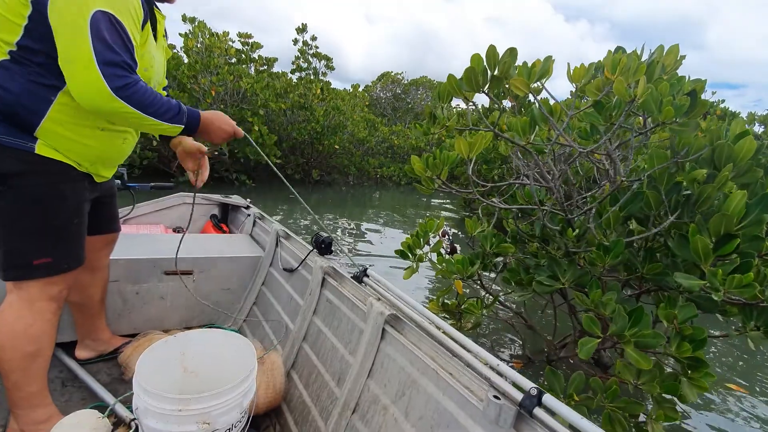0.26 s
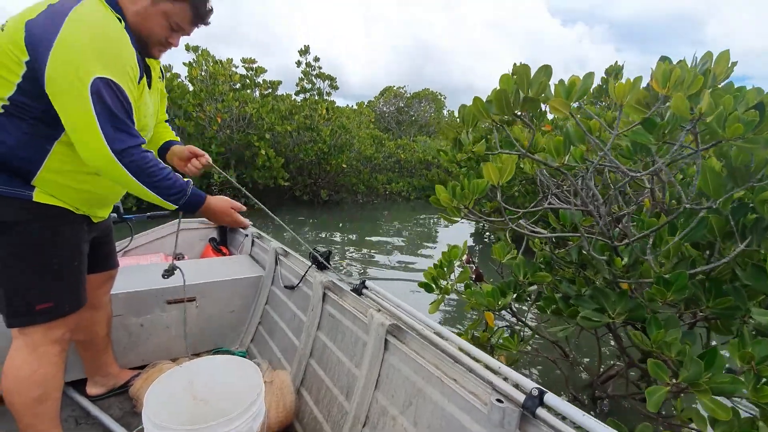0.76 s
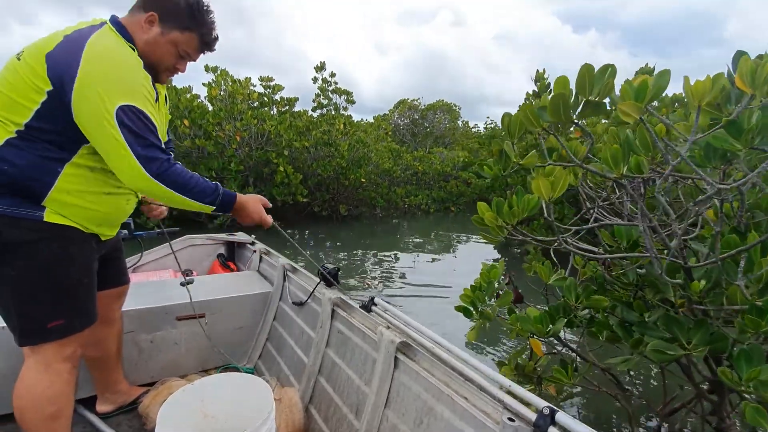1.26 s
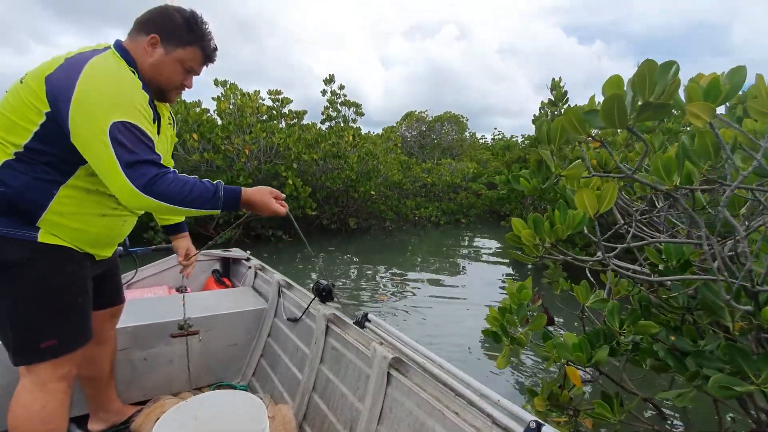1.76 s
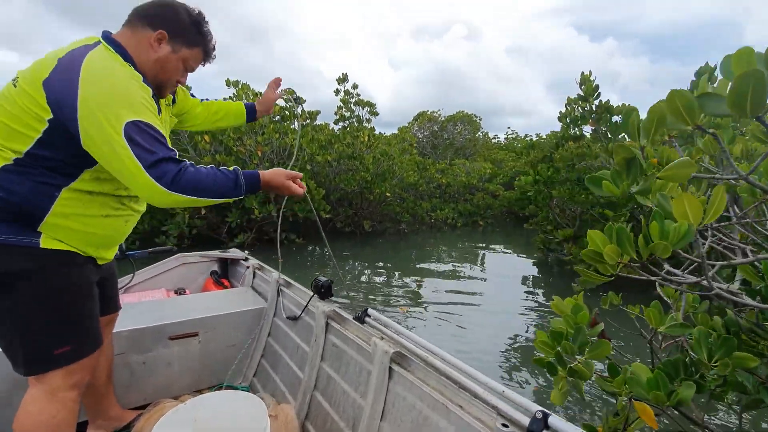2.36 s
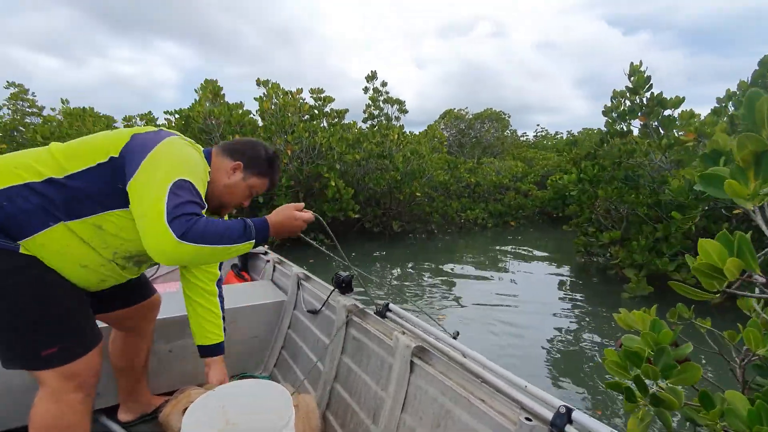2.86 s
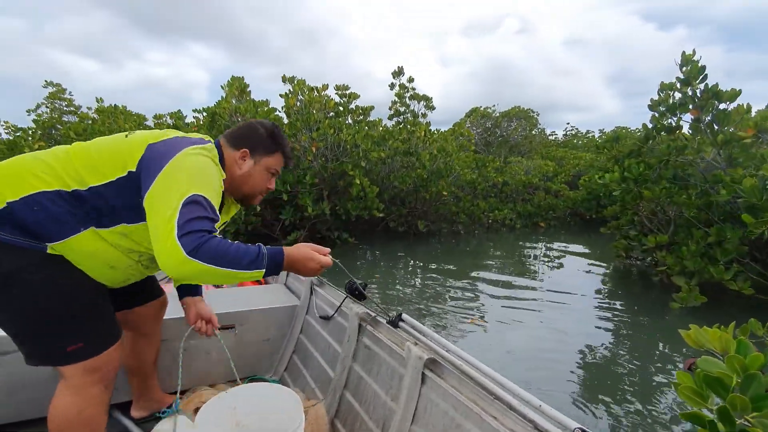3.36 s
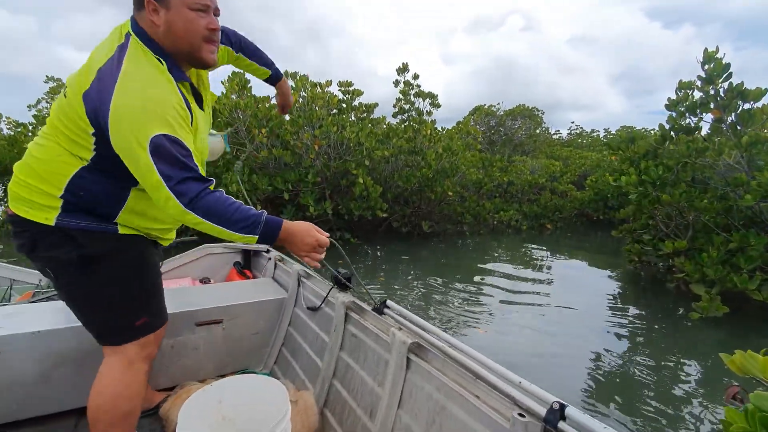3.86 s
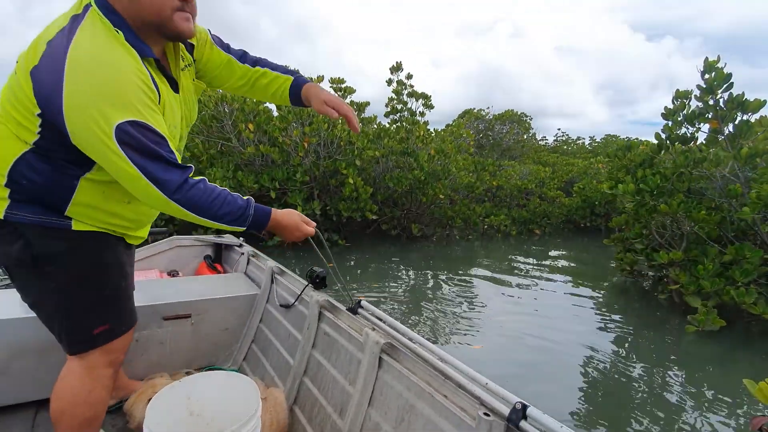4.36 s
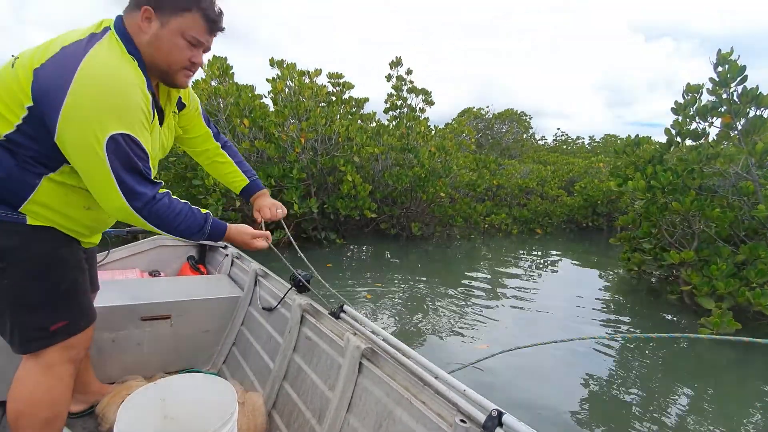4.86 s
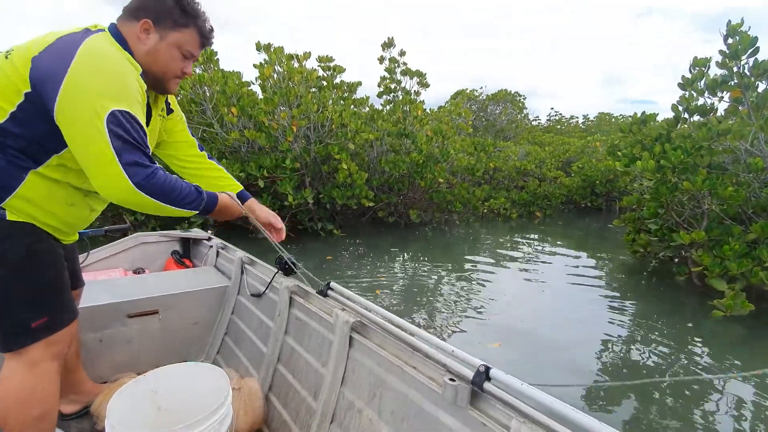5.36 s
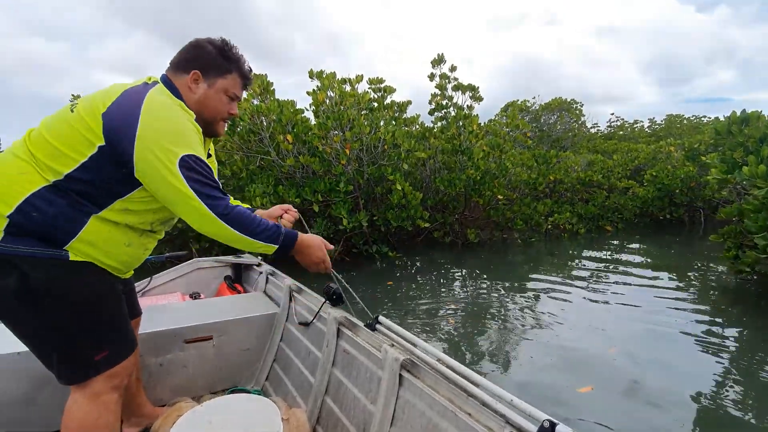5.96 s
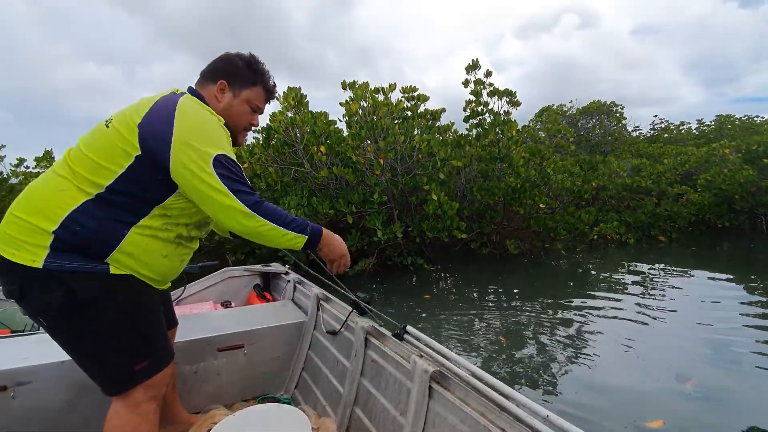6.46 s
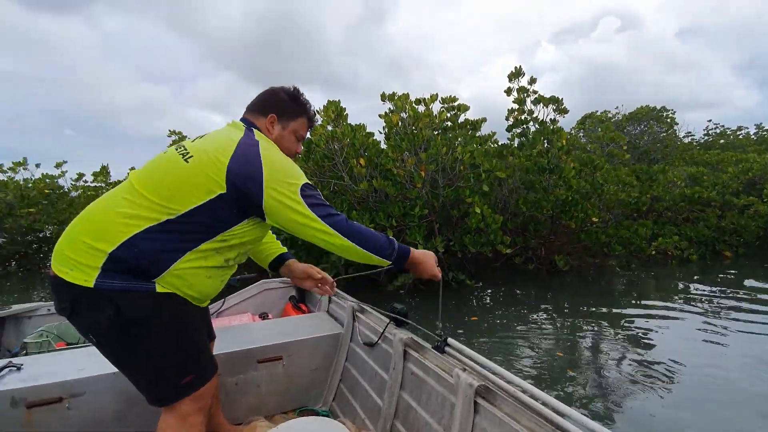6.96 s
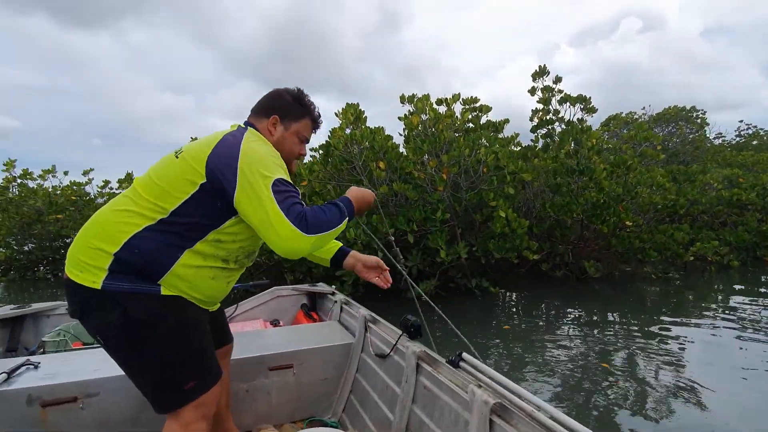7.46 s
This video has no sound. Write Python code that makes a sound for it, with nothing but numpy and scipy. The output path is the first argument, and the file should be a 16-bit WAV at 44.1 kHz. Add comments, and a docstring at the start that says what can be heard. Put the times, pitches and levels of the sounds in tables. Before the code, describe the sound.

Close, irregular metallic bangs and rattles on a small aluminium hull, with faint rope drag, wet hiss and droplets between them.

```python
"""Rope haul into an aluminium boat

A weighted rope comes hand over hand into a small boat on a still mangrove creek. Knocks excite hull modes
and dense panel noise; uneven slips drag the wet rope over the gunwale and shake damped hull modes.
Wet line hisses and swishes as shaped noise, light thuds and splashes are resonant noise bursts, and droplets
ring briefly in tuned bands. Short hollow notes are swelling sines; a light breeze on the microphone ports
and a faint far band are filtered noise."""
import sys
import numpy as np
from scipy import signal
from scipy.fft import rfft, irfft, next_fast_len
from scipy.io import wavfile

SR = 44100
rng = np.random.default_rng(int(sys.argv[2]) if len(sys.argv) > 2 else 0)


def transcribe(signal):
    """Save signal, clipped to [-1, 1], as a 16-bit WAV file at the path in sys.argv[1]."""
    frames = np.atleast_2d(signal).T
    limited = np.clip(frames, -1, 1)
    pcm = np.round(limited * 32767).astype(np.int16)
    wavfile.write(sys.argv[1], SR, pcm)


N = 340011

# ringing modes of the hull: mode_hz [Hz], level_db [dB, relative]
HULL_MODES = [(125, -9.5), (190, -6), (256, -5), (335, -11.5), (428, -10), (580, 0.5), (805, -1),
              (1030, -3), (1230, -1), (1490, -7), (2020, -10.5), (2567, -11), (3062, -9), (4780, -12)]


def from_db(db):
    """Amplitude gain is ten to the power of decibels over twenty."""
    return 10 ** (np.asarray(db) / 20)


def rms_one(x):
    """Normalise the root-mean-square amplitude to 1."""
    return x / np.sqrt(np.mean(x ** 2) + 1e-20)


def at_hz(points, hz):
    """Interpolate a spectrum linearly along a logarithmic frequency axis."""
    points = np.array(points)
    return np.interp(np.log(hz), np.log(points[:, 0]), points[:, 1])


def drift(rate_hz):
    """Slow random fluctuation of rms 1: noise through two equal low-pass poles at rate_hz."""
    step = 40   # samples between computed values
    pole = np.exp(-2 * np.pi * step * rate_hz / SR)
    noise = rng.standard_normal(N // step + 2002)
    slow = signal.lfilter([1], [1, -2 * pole, pole * pole], noise)[2000:]   # settled part
    return np.interp(np.arange(N) / step, np.arange(len(slow)), rms_one(slow))


def resonate(x, modes):
    """Parallel two-pole resonances (Hz, width Hz, dB) whose signs alternate."""
    out = 0
    for k, (hz, width_hz, level_db) in enumerate(modes):
        pole = np.exp(-np.pi * max(width_hz, 5) / SR)
        top = (1 - pole * pole) / 2 * from_db(level_db) * (-1) ** k
        feedback = [1, -2 * pole * np.cos(2 * np.pi * hz / SR), pole * pole]
        out = out + signal.lfilter([top, 0, -top], feedback, x)
    return out


def bands(noises):
    """Half-octave filter bank: (centre Hz, slice), two noises dealt in turn to neighbouring bands."""
    edges = 22 * 2 ** np.arange(0, 10, .5)
    for k, (low, high) in enumerate(zip(edges, edges[1:])):
        band = signal.butter(3, [low, high], "band", fs=SR, output="sos")
        yield np.sqrt(low * high), signal.sosfilt(band, noises[k % 2])


def spread(mid, side, hz):
    """Diffuse-field coherence: mid and side noises mixed to the left-right likeness at this pitch."""
    # likeness of diffuse sound at the two ports: band_hz [Hz], likeness [0 to 1]
    likeness = [(240, 0.93), (950, 0.49), (3770, 0.02)]
    alike = np.clip(at_hz(likeness, hz), 0, 1)
    return np.sqrt(1 + alike) * mid + np.sqrt(1 - alike) * side * [[1], [-1]]


def diffuse(spectrum, patchy_db):
    """Diffuse stereo noise of rms 1: each band has its own level, flicker and coherence."""
    out, together = 0, drift(15.0)
    low, high = spectrum[0][0], spectrum[-1][0]
    for hz, (mid, side) in bands(rng.standard_normal((2, 2, N))):
        if low / 1.5 < hz < high * 1.2:
            gain = from_db(at_hz(spectrum, hz) + patchy_db * (together + drift(24)))
            out = out + gain * spread(mid, side, hz)
    return rms_one(out)


def place(length, start_s):
    start = round(start_s * SR)
    at = slice(start, min(N, start + length))
    return at, np.arange(at.stop - start) / SR


def rubbing(low_hz, high_hz, side_db):
    """Friction excitation: uneven slips of the rope shake the hull modes between two pitches; rms 1."""
    slips = rng.standard_normal((2, N)) * from_db(2.6 * drift(12))
    damped = [(hz, 0.11 * hz, level_db) for hz, level_db in HULL_MODES if low_hz < hz < high_hz]
    shaken = resonate(slips, damped)
    mid, side = resonate(shaken, [(np.sqrt(low_hz * high_hz), high_hz, 0)])
    return rms_one(mid + from_db(side_db) * side * [[1], [-1]])


def rope(drag_db, rasp_db):
    """Friction drives low hull modes as the drag and higher ones as a wider rasp on top of it."""
    drag = rubbing(63, 450, side_db=-13.0)
    rasp = rubbing(430, 1550, side_db=-1.5)
    return from_db(drag_db) * (drag + from_db(rasp_db) * rasp)


def add_swishes(hiss_db, now):
    """Wet line whipping through the air lifts the hiss to a crest, falling linearly in dB on both sides."""
    # whips of the line: crest_s [s], level_db [dB], length_s [s]
    swishes = [(4.441, -42.5, 0.21), (5.975, -36.5, 0.042)]
    for crest_s, level_db, length_s in swishes:
        away = np.abs(now - crest_s) / length_s
        hiss_db = np.maximum(hiss_db, level_db - 16 * away)   # 16 dB down after one length
    return hiss_db


def spatter(hiss_db):
    """Random arrivals: droplets fly off the line, more with a louder hiss; each rings a few damped cycles."""
    born = rng.random(N) < 260 * from_db(hiss_db + 48) / SR   # 260 a second at -48 dB
    sizes = born * from_db(3.5 * np.minimum(rng.exponential(1, N), 4) - 39.5)
    dealt, out = rng.integers(0, 12, N), np.zeros((2, N))
    for k, hz in enumerate(np.geomspace(1300, 7000, 12)):
        drops = sizes * (dealt == k) + 1e-18
        balance = from_db(rng.normal(0, 1.9, (2, 1)))
        out += resonate(drops, [(hz, 0.16 * hz, 0)]) * balance
    return out


def wet_line(hiss_db):
    """Broadband diffuse noise for the wet hiss, joined by the droplets that follow its level."""
    # colour of the hiss: band_hz [Hz], density_db [dB per Hz, relative]
    hiss = [(880, -35), (1500, -9), (2740, -7.5), (5750, -12.5), (9220, -19), (15100, -21)]
    return from_db(hiss_db) * diffuse(hiss, patchy_db=1.8) + spatter(hiss_db)


def breeze(now):
    """Wind rumble on the microphone ports: low-frequency diffuse noise under a gust envelope."""
    # colour of the rumble: band_hz [Hz], density_db [dB per Hz, relative]
    rumble = [(22, -16.5), (65, 1), (110, -8), (170, -19)]
    # strength of the breeze: time_s [s], level_db [dB]
    gusts = [(0, -47.5), (.7, -57), (2.1, -62), (3.6, -58), (6.1, -54.5), (7.71, -45.5)]
    return from_db(np.interp(now, *np.transpose(gusts))) * diffuse(rumble, patchy_db=2.5)


def far_band(now):
    """A faint band from afar: diffuse noise of limited bandwidth under a slow envelope."""
    # its colour: band_hz [Hz], density_db [dB per Hz, relative]
    colour = [(1180, -14), (1670, 1), (2370, -13), (3350, -9.5), (4740, -29.5)]
    # its strength: time_s [s], level_db [dB]
    strength = [(0, -76), (1.2, -63.5), (2.0, -82.5), (2.9, -60), (3.5, -71), (7.71, -84.5)]
    return from_db(np.interp(now, *np.transpose(strength))) * diffuse(colour, patchy_db=1)


def bloops():
    """Damped oscillation: hollow notes swell, waver and die as sines under a gamma-shaped envelope."""
    # likely drops and light taps on one panel: start_s [s], pitch_hz [Hz], level_db [dB], swell_s [s]
    notes = [(0.587, 309, -46.5, 0.016), (1.618, 1228, -35.5, 0.0044), (2.376, 452, -49.5, 0.0078),
             (4.47, 610, -36, .0017), (6.448, 1240, -46.5, 0.0066), (7.206, 251, -38.5, 0.013)]
    out, waver = np.zeros(N), from_db(3.2 * drift(60))
    for start_s, hz, level_db, swell_s in notes:
        at, age = place(SR // 10, start_s)
        envelope = age / swell_s * np.exp(1 - age / swell_s)
        out[at] += from_db(level_db) * waver[at] * envelope * np.sin(2 * np.pi * hz * age)
    return out


def panels():
    """Modal density: noises heaped on scattered narrow modes, so each blow finds other strengths."""
    count, width_hz, gap_db = 70, 29.5, -10.5   # gap_db: floor between modes re one mode's peak
    size = next_fast_len(N)
    hz = np.fft.rfftfreq(size, 1 / SR)
    modes = 450 + 7550 * (np.arange(count) + rng.random(count)) / count   # 450 Hz to 8 kHz
    peaks = sum(1 / (1 + (2 * (hz - mode) / width_hz) ** 2) for mode in modes)
    outside = (hz > 8000) + (hz < 450)   # smooth noise beyond the scattered modes
    heaped = np.sqrt(peaks + from_db(2 * gap_db) + outside)
    return irfft(rfft(rng.standard_normal((2, 3, size))) * heaped, size)[..., :N]


def panel_bands():
    """Two-port reception: panel noise in stereo bands with delay, level and coherence set by pitch."""
    slices = []
    for hz, (shared, left, right) in bands(1.65 * panels()):
        near = np.clip((hz - 400) / 700, 0, 1)   # long waves reach both ports alike
        late = np.roll(shared, round(near * 0.00018 * SR))   # short ones reach the left port later
        apart = 1.48 * near + 0.27   # bounces inside the boat differ at each port
        tilt_db = at_hz([(300, .2), (900, 2.4), (5000, -0.99)], hz)
        sides = from_db(tilt_db * np.array([[1], [-1]]))
        slices.append((hz, sides * np.array([late + apart * left, shared + apart * right])))
    return slices


def knocks():
    """Impact excitation: each blow cracks and chatters, then panels die band by band as single modes ring."""
    # blows on the hull: start_s [s], level_db [dB], thud_db [dB, relative], bright_db [dB, relative],
    # spot_hz [Hz, strongest region], chatter_s [s, time before the decay]
    blows = [(0.666, -24.5, -8, -33, 1184, 0.02), (1.2608, -4, -20, -16, 2340, 0.0073),
             (1.541, -40, -8, -55, 980, 0.02), (1.619, -27.5, -12, -19.5, 2050, 0.0051),
             (1.649, -39, -8.5, -31, 1190, 0.039), (2.591, -13, -19, -29, 1310, 0.003),
             (2.92, -26, -13.5, -29, 1890, 0.0069), (3.041, -6.5, -13.5, -11, 900, 0.0014),
             (3.066, -16.5, -6.5, -14.5, 299, 0.011), (3.404, -27, -0.5, -14, 606, 0.0044),
             (3.53, -36.5, 3.5, -6, 197, 0.0072), (3.696, -6.5, -17.5, -28.5, 984, 0.028),
             (3.784, -16.5, -17, -4.5, 2940, 0.0027), (4.306, -30.5, -19, -12.5, 1890, 0.0011),
             (4.857, -2.5, -14, -10, 560, 0.0022), (4.948, -20, -29, -10.5, 2440, 0.01),
             (5.0742, -12, -29.5, -10.5, 4010, 0.0062), (5.1, -26, -32, -10, 2480, 0.0026),
             (5.279, -6, -16, -14, 1248, 0.017), (5.437, -13, -6, -12, 1560, 0.0053),
             (5.468, -25.5, -21, -20.5, 1520, 0.0095), (5.756, -14, -10, -20.5, 1100, 0.0006),
             (6.291, -8, -21.5, -10.5, 1100, 0.024), (6.344, -16, -9, -23, 1093, 0.005),
             (6.828, -18.5, -5, -33, 910, 0.0086), (6.837, -8.5, -27, -9.5, 1026, 0.035),
             (6.872, -14.5, -5, -5, 5260, 0.0044), (6.905, -13, -18, -4, 6400, 0.0022)]
    # dense panel modes: band_hz [Hz], density_db [dB per Hz, relative]
    plate = [(59, -38.5), (100, -10.5), (410, -5), (1190, 0.5), (2990, -5.5), (9270, -34.5), (14200, -43)]
    # decay of a ring of share 1: band_hz [Hz], t60_s [s]
    plate_t60 = [(100, 0.37), (260, 0.3), (700, 0.18), (1840, 0.15), (12800, 0.1)]
    damped_share = 0.27   # decay time of a heavy thud, as a share of plate_t60
    linger_db, linger_times = -21.5, 2   # a weaker part of the ring decays over a longer time
    snap_db, snap_s = 8, 0.003   # extra treble at 9 kHz just after the touch, and its fading time
    out, slices = np.zeros((2, N)), panel_bands()
    grit = from_db(1.62 * drift(80))   # uneven contacts while the weight rattles
    mode_hz, mode_db = np.transpose(HULL_MODES)[:, :, None]
    chance = rng.standard_normal((len(blows), 3, len(HULL_MODES), 1))
    for (start_s, level_db, thud_db, bright_db, spot_hz, chatter_s), draw in zip(blows, chance):
        height_draw, tune_draw, side_draw = draw
        # dull blows ring shorter, thudding ones approach the damped share
        free = 1 + 0.0187 * bright_db
        ring = free + (damped_share - free) / (1 + from_db(8.9 * (-3.5 - thud_db)))
        at, age = place(round(.4 * SR), start_s)
        soft_s = .0003 * from_db(-.35 * (bright_db + 10))   # a dull blow is a slow contact

        def shape(hz):
            """Spectral colour of the struck spot, with frequency-dependent build-up and damping."""
            tone = [(420, thud_db + 21), (850, 0.00072), (1700, 0.2 * (bright_db + 21.5)),
                    (5500, bright_db + 22.0)]
            colour_db = at_hz(tone, hz) + 6 * np.exp(-(np.log2(hz / spot_hz) / 0.42) ** 2)
            fall_db = -60 * np.maximum(age - abs(chatter_s), 0) / (abs(ring) * at_hz(plate_t60, hz))
            dying = from_db(fall_db) + from_db(linger_db + fall_db / linger_times)
            swell = 1 - np.exp(-age / (1 / hz + soft_s))   # lows need a cycle or two to build
            treble_db = snap_db * np.clip(hz / 9000, 0, 2) * np.exp(-age / snap_s)
            return from_db(colour_db + treble_db) * dying * swell

        dense = sum(from_db(at_hz(plate, hz)) * shape(hz) * noise[:, at] for hz, noise in slices)
        # the first touch is one sharp push and pull, reaching the left port later
        contact = (age - [[.0012], [.001]]) / (.3 * soft_s)
        crack = from_db(15) * contact * np.exp(-contact ** 2)
        # the struck panel sings at its own pitch
        spot_gain = from_db(at_hz(plate, spot_hz) - 19.5)
        spot = spot_gain * shape(spot_hz) * np.sin(2 * np.pi * spot_hz * age)
        height = from_db(mode_db - 22.0 + 1.1 * height_draw) * shape(mode_hz)
        # hand and load detune the panels
        turn = 2 * np.pi * (mode_hz * (1 + 0.015 * tune_draw) * age + tune_draw)
        shift = side_draw * (mode_hz > 500)   # higher modes differ in phase at the right port
        modes = [np.sum(height * np.sin(turn + side * shift), axis=0) for side in (0, 1)]
        out[:, at] += from_db(level_db - 9.0) * ((dense + spot) * grit[at] + modes + crack)
    return out


def ticks():
    """Resonant noise bursts: gritty light thuds and knocks on the hull, and bright ticks and splashes."""
    # light thuds, knocks, ticks and splashes: start_s [s], level_db [dB], pitch_hz [Hz],
    # length_s [s, time to fall 30 dB]
    bursts = [(1.463, -55, 1040, 0.097), (2.187, -47, 6400, 0.063), (2.279, -49, 3620, 0.05),
              (2.352, -47, 5100, 0.033), (2.385, -52, 5860, 0.023), (2.89, -53, 5570, 0.061),
              (3.242, -41.5, 5400, 0.12), (3.292, -41, 6530, 0.048), (3.626, -41, 2250, 0.1),
              (3.675, -30.5, 2170, 0.16), (4.105, -46.5, 4850, 0.14), (4.204, -37.5, 4700, 0.05),
              (4.313, -37.5, 293, 0.11), (4.338, -25.5, 2100, 0.065), (4.386, -42.5, 330, 0.036),
              (4.429, -43.5, 600, .06), (5.165, -36.5, 2880, 0.069), (5.191, -34.5, 2180, 0.058),
              (6.145, -38.5, 108, 0.043)]
    out, grit = np.zeros((2, N)), from_db(2.3 * drift(140))
    for start_s, level_db, hz, length_s in bursts:
        at, age = place(SR // 4, start_s)
        mid, side = resonate(rng.standard_normal((2, len(age))), [(hz, 0.46 * hz, 0)])
        burst = rms_one(spread(mid, side, hz))
        fall = from_db(level_db - 30 * age / abs(length_s))
        swell = np.tanh(age / (0.053 * abs(length_s)))
        out[:, at] += burst * grit[at] * fall * swell
    return out


def scene():
    """Linear superposition of drag, wet line, breeze, far band, hollow notes, blows and light ticks."""
    # the haul: time_s [s], drag_db [dB], rasp_db [dB re the drag], hiss_db [dB]
    haul = [(0, -53.5, -19, -65), (.1, -43, -5.5, -59), (.37, -47.5, -4, -60), (.52, -59.5, -3.5, -60.5),
            (1.299, -58.5, -4, -65), (2.101, -71.5, -3, -75), (2.85, -61.5, -8, -66.5),
            (3.2, -57, 2, -60.5), (3.45, -66.5, -8, -62), (3.983, -43.5, 0.5, -47), (4.1, -58, -12, -65),
            (4.8, -57.5, -5, -60), (5.221, -49.5, 0.5, -54.5), (5.598, -52.5, -12.5, -64),
            (5.94, -45, -7.5, -53.5), (6.582, -64.5, -7, -72), (7.15, -58.5, -4.5, -61),
            (7.45, -44.5, -13, -60), (7.71, -57.5, -6, -57.5)]
    now = np.arange(N) / SR
    time_s, *columns = np.transpose(haul)
    drag_db, rasp_db, hiss_db = (np.interp(now, time_s, column) for column in columns)
    hauled = rope(drag_db, rasp_db) + wet_line(add_swishes(hiss_db, now))
    air = breeze(now) + far_band(now)
    return hauled + air + bloops() + knocks() + ticks()


def record(dry):
    """Microphone response: resonances colour the treble, saturation rounds peaks, a low-pass cuts the top."""
    # treble colour: centre_hz [Hz], width_hz [Hz], lift_db [dB]
    treble = [(7470, 1800, 5), (9360, 3800, -6.5)]
    for hz, width_hz, lift_db in treble:
        dry = dry + (from_db(lift_db) - 1) * resonate(dry, [(hz, width_hz, 0)])
    rounded = np.tanh(dry) * 1.188
    top_cut = signal.cheby2(12, 60, 16900, fs=SR, output="sos")   # 60 dB down from 16.9 kHz
    return signal.sosfilt(top_cut, rounded)


dry = scene()
out = record(dry)
transcribe(out)
```